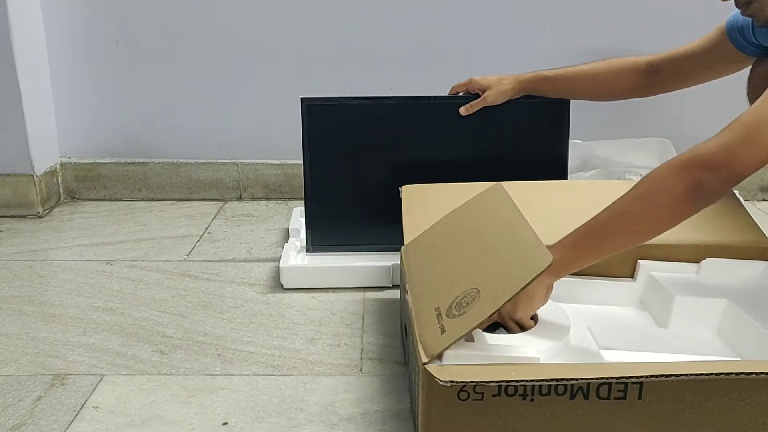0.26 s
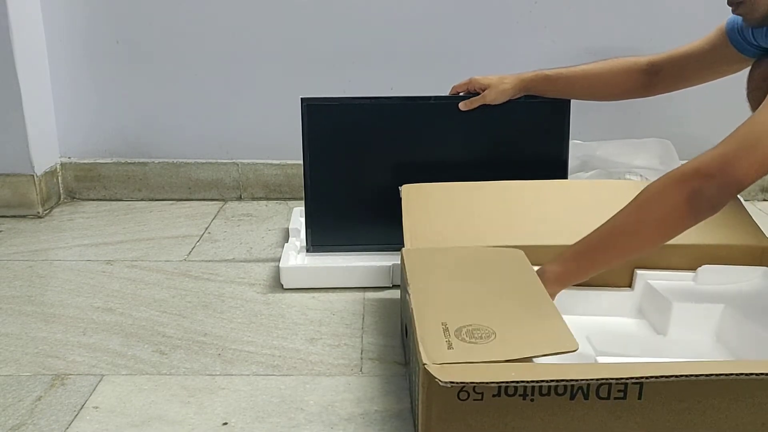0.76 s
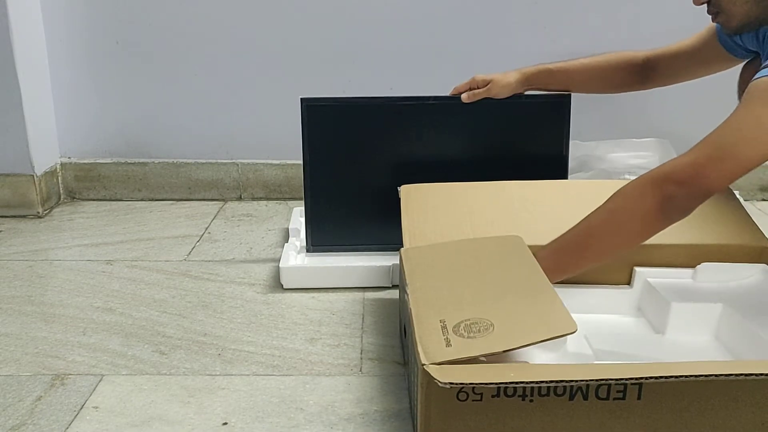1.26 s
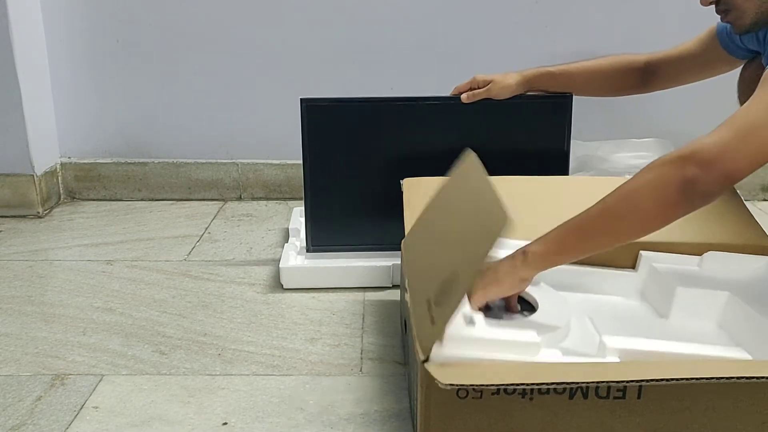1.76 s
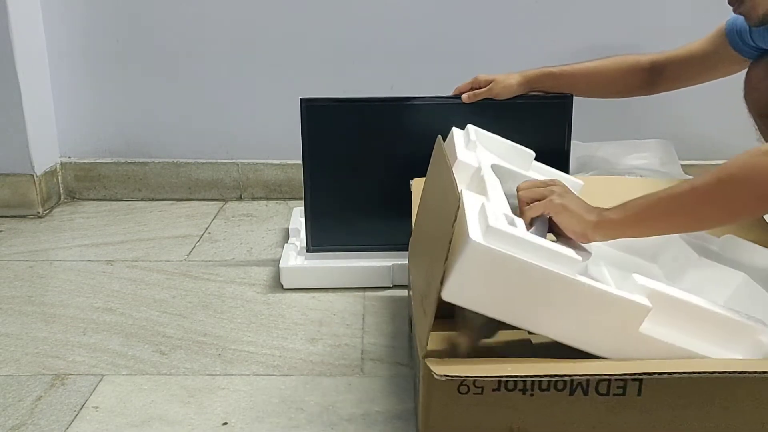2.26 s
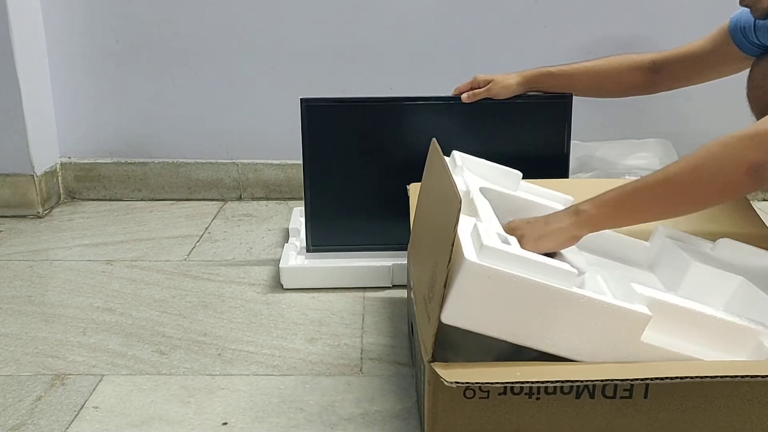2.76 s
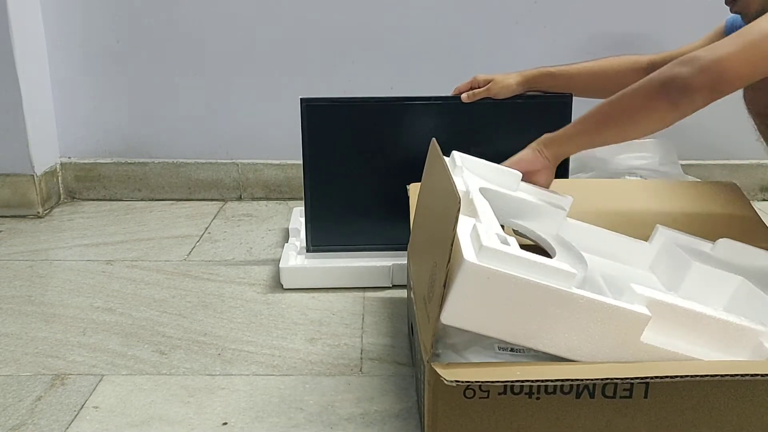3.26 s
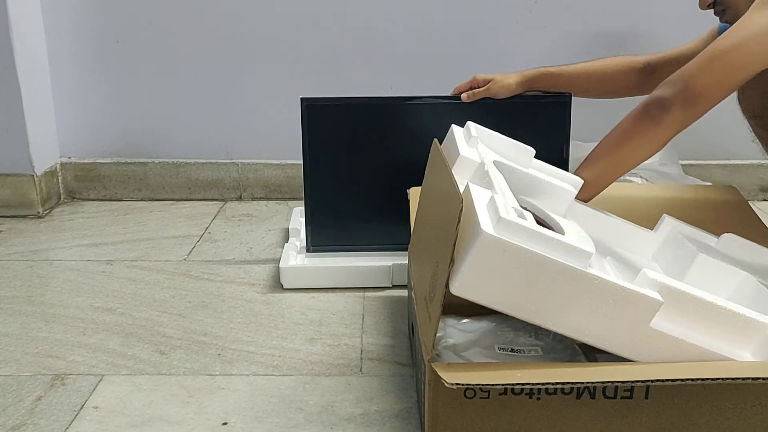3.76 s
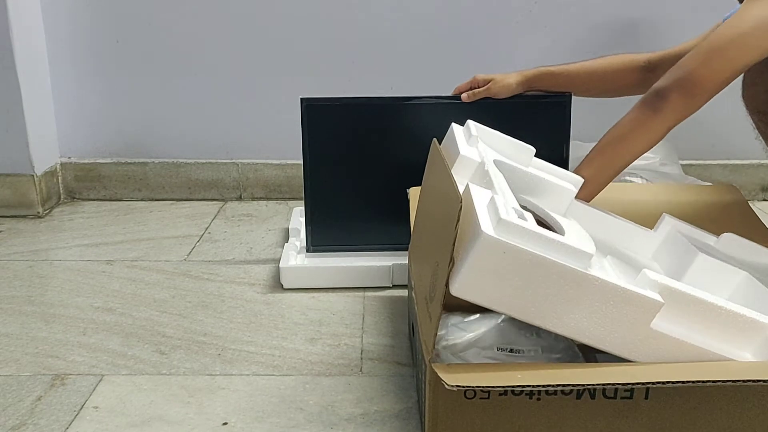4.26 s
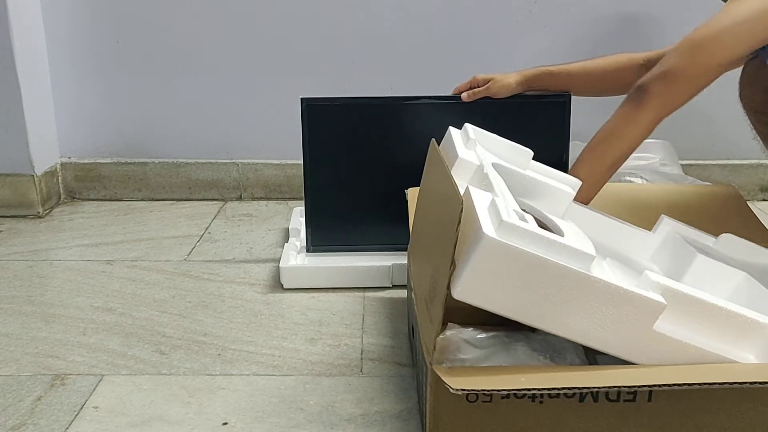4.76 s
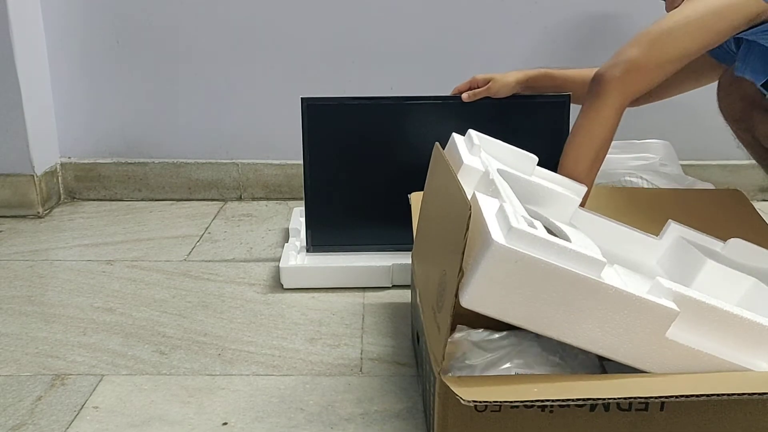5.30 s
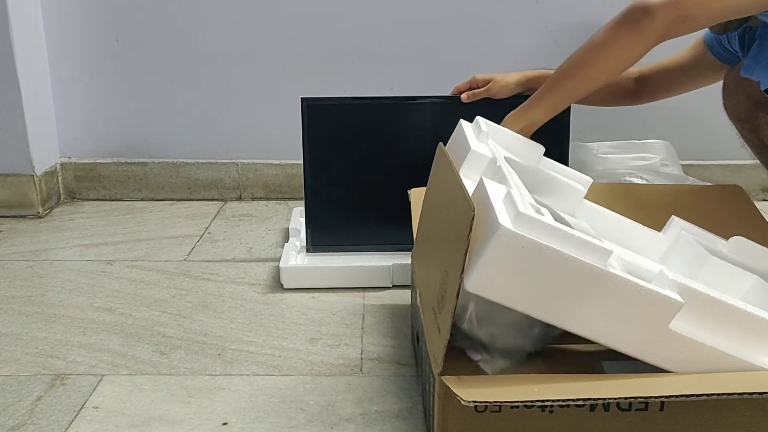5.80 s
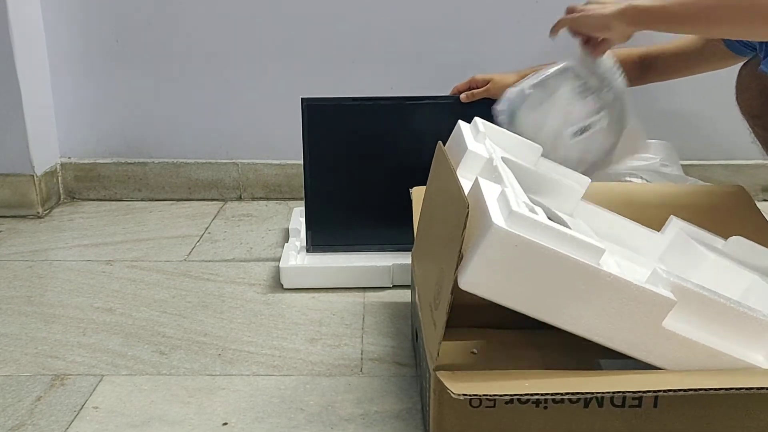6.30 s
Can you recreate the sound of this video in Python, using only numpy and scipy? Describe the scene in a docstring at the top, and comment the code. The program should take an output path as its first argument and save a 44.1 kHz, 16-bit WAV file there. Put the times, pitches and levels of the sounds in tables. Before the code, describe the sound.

Dry cardboard flap rubbing, then squeaky polystyrene foam scraping up a box wall, hollow knocks, rustling plastic bag, and a final heavy double boom indoors.

```python
"""In a bare, tiled room, a polystyrene tray is levered out of a cardboard box.
A flap rubs and foam scrapes up the wall: random slips coloured as hiss, fizz and panel drone; edges rasp.
Knocks are swelling, damped sines with bursts of crushed beads, and small snaps are filtered noise bursts.
A bagged hard part, a bank of dying sines, is dragged out from underneath, and the tray drops back with
a hollow boom. Decaying noise and standing waves make the echoes, over coloured noise for quiet air."""
import sys
import numpy as np
from scipy import signal
from scipy.fft import rfft, irfft, next_fast_len
from scipy.io import wavfile

SR = 44100
rng = np.random.default_rng(int(sys.argv[2]) if len(sys.argv) > 2 else 0)


def generate_wav(signal):
    """Clip the signal to [-1, 1] and save it as 16-bit WAV at the path in sys.argv[1]."""
    frames = np.transpose(np.atleast_2d(signal))
    scaled = np.clip(frames, -1, 1) * 32767
    pcm = np.round(scaled).astype(np.int16)
    wavfile.write(sys.argv[1], SR, pcm)


N = 288414
TIME = np.arange(N) / SR  # s

# fine bead fizz of flap and bag, relative spectrum: f/Hz, level/dB per Hz
FINE_FIZZ = [(5000, -27), (8500, 10.5), (10500, 7.5), (12500, 5), (14000, 10), (15700, 13)]
# drone of the panels under foam and bag, relative spectrum: f/Hz, level/dB per Hz
PANEL_DRONE = [(25, -43), (60, 3), (100, -6), (130, 3), (200, 7), (330, 6), (450, 1.5), (650, -4.5),
               (1000, -1), (1500, -27), (3000, -23)]


def amp(db):
    """Decibels to gain."""
    return 10 ** (np.asarray(db) / 20)


def unit(x):
    """Scales to rms 1."""
    return x / np.sqrt(np.mean(x ** 2) + 1e-20)


def read(points, hz):
    """Reads a table along a log-frequency axis."""
    f, value = np.transpose(points)
    return np.interp(np.log(hz + 1), np.log(f + 1), value)


def add(mix, s, sound):
    """Mixes a sound in at time s."""
    part = mix[max(round(s * SR), 0):][:len(sound)]
    part += sound[:len(part)]


def convolve(x, response):
    """Convolution along time, cut to the scene's length."""
    return signal.fftconvolve(np.atleast_2d(x), np.atleast_2d(response), axes=1)[:, :N]


def colour(x, points, size=4096):
    """Causal (minimum-phase) filter of energy 1, shaped like the given spectrum."""
    hz = abs(np.fft.fftfreq(size, 1 / SR))
    log_gain = np.log(amp(read(points, hz)))
    spectrum = np.exp(np.conj(signal.hilbert(log_gain)))
    taps = np.fft.ifft(spectrum).real[:size // 2]
    return convolve(x, taps / np.linalg.norm(taps))


def diffuse(pair):
    """Two unrelated signals become sound from all sides: long waves reach both microphones nearly alike."""
    spacing_m, sound_speed = 0.16, 343  # m, m/s
    size = next_fast_len(pair.shape[1])
    a, b = rfft(pair, size)
    hz = np.fft.rfftfreq(size, 1 / SR)
    likeness = np.sinc(2 * hz * spacing_m / sound_speed) * .97
    mid = a * np.sqrt((1 + likeness) / 2)
    side = b * np.sqrt((1 - likeness) / 2)
    return irfft(np.array([mid + side, mid - side]), size)[:, :pair.shape[1]]


def ring(modes, phase=0):
    """One second of dying sines, one for each resonance."""
    t = TIME[:SR]
    return sum(amp(db - 60 * t / t60) * np.sin(2 * np.pi * hz * t + phase) for hz, db, t60 in modes)


def wander(per_s):
    """Random fluctuation of rms 1, taking a new value per_s times a second with straight lines between."""
    knots = rng.standard_normal(N // 32)
    return unit(np.interp(TIME * per_s, np.arange(len(knots)), knots))


def grains(per_s, spread_db):
    """Tiny slips at random moments and of either sign; spread_db scatters their sizes."""
    size = amp(spread_db * np.minimum(rng.exponential(1, (2, N)), 5))
    sign = rng.choice([-1, 1], (2, N))
    happens = rng.random((2, N)) < per_s / SR
    return unit(diffuse(size * sign * happens))


def burst(rise_s, decay_s):
    """Many beads giving way at once: a dense, quickly dying cluster of noise."""
    t = TIME[:SR // 4]
    shape = (1 - np.exp(-t / rise_s)) * np.exp(-t / decay_s)
    return shape / shape.max() * rng.standard_normal(len(t))


def effort(strokes):
    """In every stroke the hand speeds up, then slows to a stop: gains of two layers, first and second."""
    first_law, second_law = 0.7, 1  # loudness grows as these powers of speed, so the second needs more
    first, second = np.zeros((2, N))
    for start, rise_s, fall_s, db, second_db in strokes:
        speeding = (TIME - start) / rise_s
        slowing = 1 - (TIME - start - rise_s) / fall_s
        speed = np.clip(np.minimum(speeding, slowing), 0, 1)
        first += (amp(db) * speed ** first_law) ** 2  # overlapping strokes add in power
        second += (amp(db + second_db) * speed ** second_law) ** 2
    return np.sqrt(first), np.sqrt(second)


def stroke(strokes, hiss_colour, fizz_colour, drone_colour, drone_db, drone_law, judder_db, slips_per_s):
    """Beads catch and let go: a hiss, a fine fizz, and the drone of the panels, which even a light touch shakes."""
    firm_db = -43.5  # hiss of an ordinary, firm stroke; drone_db is the drone beneath it
    hiss, fizz = effort(strokes)
    drone = amp(drone_db) * (hiss / amp(firm_db)) ** drone_law
    grip = unit(amp(judder_db * wander(140)))  # stick and slip, shared by all sizes of grain
    # whole beads tearing free, mixed under the finer slips
    catches = convolve(grains(per_s=100, spread_db=1.0), burst(rise_s=0.00054, decay_s=0.0045))
    slips = unit(grains(slips_per_s, spread_db=0.0) + amp(-7) * unit(catches))
    sound = hiss * colour(slips, hiss_colour) + fizz * colour(slips, fizz_colour)
    sound += drone * colour(grains(per_s=450, spread_db=1.5), drone_colour)
    return sound * grip


def quiet_air():
    """The room's quiet air: steady noise from all sides, strongest in the lows."""
    # relative spectrum: f/Hz, level/dB per Hz
    air_colour = [(25, -23), (55, 4.5), (100, -1), (125, 3), (250, -0.5), (600, -5), (1500, -16),
                  (4000, -26.5), (7000, -25), (10000, -33.5), (15500, -32)]
    return amp(-50.5) * colour(diffuse(rng.standard_normal((2, N))), air_colour)


def flap():
    """The cardboard flap rubs on arm and foam: dense slips, with the flap's own drone."""
    # start t/s, speeding up t/s, slowing down t/s, hiss level/dB, bead fizz over the hiss level/dB
    rubs = [(0.0, 0.0011, 0.21, -49.5, -4.5), (0.1, 0.018, 0.36, -50, -4), (0.29, 0.052, 0.34, -50.5, -5),
            (0.5, 0.0058, 0.21, -50.5, -6), (0.61, 0.037, 0.22, -46.5, -0.5),
            (0.71, 0.067, 0.31, -46.5, -5), (1.04, 0.058, 0.18, -45, -1.5), (1.2, 0.24, 0.048, -50, -4),
            (1.365, 0.028, 0.22, -42, -3.5), (1.53, 0.023, 0.19, -47.5, 1), (1.58, 0.11, 0.061, -46, -1)]
    # relative spectra: f/Hz, level/dB per Hz
    hiss_colour = [(400, 0), (1200, 2), (2000, -1), (3000, -5), (4500, -6), (7000, -4), (8500, -15),
                   (11000, -18)]
    drone_colour = [(25, -1), (60, -7), (110, -12.5), (200, 2.5), (330, 1.5), (450, -1), (600, -6),
                    (800, -11), (1050, -5), (1500, -19.5), (3000, -32)]
    return stroke(rubs, hiss_colour, FINE_FIZZ, drone_colour,
                  drone_db=-43.5, drone_law=0.82, judder_db=0.9, slips_per_s=9000)


def swing(hz, swell_s):
    """A damped panel under a soft blow: it swells and is still again within a few cycles."""
    t = TIME[:SR // 10]
    u = t / swell_s
    return (u * np.exp(1 - u)) ** 2 * np.sin(2 * np.pi * hz * t)


def knocks():
    """Each blow swings tray, box wall and enclosed air for a few cycles, and crushes beads: (thuds, crush)."""
    # foam and flap knocking on the box: t/s, tray swing level/dB, tray f/Hz, wall over the tray swing level/dB,
    # # wall f/Hz, then over the tray swing: crunch level/dB, hardness level/dB, squeezed-out air level/dB
    blows = [(0.085, -34, 170, -9, 289, -14.5, -29, -12), (0.125, -44, 152, -4, 280, -10, -26, -18),
             (0.723, -32.5, 216, -2, 352, -16, -27, -14.5), (0.803, -38, 215, 4, 324, -6, -33, -30),
             (0.852, -20, 218, -4.5, 388, -19, -49, -40), (0.93, -31, 229, 0, 364, -26, -38, -33),
             (1.41, -46, 199, -5, 376, 1, -20, -2), (1.551, -23, 205, -3, 336, -22, -28.5, -28),
             (1.642, -30, 189, 1, 304, -28, -31, -30), (1.781, -20.5, 200, -9.5, 310, -31, -22, -29),
             (2.142, -39.5, 255, 14.5, 340, 0, -6, 3), (2.175, -30.5, 169, -6, 430, -7, -15, -14),
             (2.208, -36, 172.4, 0, 354, -3, -17, -21), (2.616, -23.5, 172, 1.5, 312, -5.5, -21, -14),
             (2.69, -36.5, 155, 5, 269, -13, -30, -16), (3.065, -12, 265.7, -6.5, 315, -10, -18.5, -20.5),
             (3.112, -26.5, 160, -1, 273, -13.5, -17, -30), (3.16, -26.5, 173, 1, 283, -7, -21, -31),
             (3.403, -22, 215, -0.5, 348, -7.5, -26, -18), (3.433, -23, 181, -6, 409, -7, -21.5, -20),
             (3.727, -39, 145, 1, 343, -6.5, -21, -3), (3.77, -38.5, 149, -10, 324, -8, -22, -1.5),
             (3.81, -28.5, 224.2, 12.5, 332.5, -3.5, -21, -15.5),
             (4.136, -40.5, 188, 12, 317, -22, -41, -35), (4.216, -34, 237, 3, 315, -3, -37, -40),
             (4.671, -32.5, 160, 0.5, 286, -8.5, -23, -29), (4.785, -38.5, 215, -8, 330, -9, -23, -22),
             (4.92, -42, 235, -4, 424, -6, -26, -28), (5.66, -40, 230, -1, 373, -8, -22, -24),
             (5.448, -30, 166, -21, 320, -28, -34, -21), (5.889, -7.5, 155, -2.5, 298, -18.5, -36.5, -36),
             (5.919, -6, 218, -23, 502, -29, -35.5, -38), (6.099, -17.5, 143, 1, 316, -22.5, -35.5, -50),
             (6.121, -13, 212, -24, 297, -31, -47, -52)]
    # relative spectra of crushed beads, breaking beads and squeezed-out air: f/Hz, level/dB per Hz
    crunch_colour = [(30, -6), (100, -2.5), (250, 2.5), (400, -1.5), (520, 1.5), (680, 0), (760, -4.5),
                     (860, -2), (1000, -6.5), (1800, -15.5), (3000, -29.5), (6000, -44)]
    crack_colour = [(800, -22), (1800, 6.5), (2400, -1), (3100, 2.5), (4200, 5), (5000, 7), (5400, 6.5),
                    (5800, 8.5), (6400, 2.5), (7500, 2.5), (10000, -4.5), (15500, -12)]
    push_colour = [(20, -26.5), (40, -17), (58, -1), (70, -2), (84, 1), (98, -9.5), (130, -4.5),
                   (200, -5.5), (400, -57)]
    upper_ratio, upper_db = 1.472, -14.5  # the wall's next mode: pitch and level against the first
    cavity_hz = 126.8  # the air inside the box
    cavity_db, cavity_per_hardness = 1, 0.44  # dB, dB per dB: a harder blow shakes the air more
    radiate_hz = 108.5  # below this the small panels move air poorly
    thumps, crunches, cracks, pushes = np.zeros((4, N))
    for s, db, hz, wall_db, wall_hz, crunch_db, hard_db, push_db in blows:
        tray = swing(hz, swell_s=0.0065)
        wall = swing(wall_hz, swell_s=0.0066)
        wall += amp(upper_db) * swing(wall_hz * upper_ratio, swell_s=0.0045)
        cavity = amp(cavity_db + cavity_per_hardness * hard_db) * swing(cavity_hz, swell_s=0.01)
        # the panels give first; beads break once the load has built up
        add(thumps, s - .003, amp(db) * (tray + amp(wall_db) * wall + cavity))
        add(crunches, s, amp(db + crunch_db) * burst(rise_s=0.00028, decay_s=0.034))
        add(cracks, s + .002, amp(db + hard_db) * burst(rise_s=0.016, decay_s=0.013))
        add(pushes, s, amp(db + push_db) * burst(rise_s=0.0067, decay_s=0.049))
    radiation = signal.butter(5, radiate_hz, "high", fs=SR, output="sos")
    thuds = signal.sosfilt(radiation, thumps) + colour(pushes, push_colour)
    crush = colour(crunches, crunch_colour) + colour(cracks, crack_colour)
    return thuds, crush


def resonate(x, hz, width_hz):
    """A resonance that follows the curve hz: shift the pitch down to zero, smooth, shift back."""
    turn = np.exp(2j * np.pi * np.cumsum(hz) / SR)
    r = np.exp(-np.pi * width_hz / SR)
    smooth = signal.lfilter([1 - r], [1, -r], x / turn + 1e-18)
    return 2 * (turn * smooth).real


def rasps():
    """A foam edge chatters over cardboard: uneven slips ring the panel, its pitch shifting as the edge travels."""
    # start t/s, length t/s, level/dB, first f/Hz, last f/Hz
    edge_rasps = [(0.41, 0.13, -51, 470, 450), (0.558, 0.13, -47, 570, 684), (1.39, 0.17, -49.5, 616, 720),
                  (2.124, 0.083, -41.5, 523, 488), (2.57, 0.11, -43, 600, 676),
                  (3.417, 0.097, -34, 754, 560), (3.814, 0.14, -40, 603, 500), (4.662, 0.14, -48, 677, 720),
                  (4.88, 0.15, -51.5, 650, 705), (5.627, 0.17, -50, 605, 570)]
    width_hz = 210  # of the panel resonance, which is applied twice
    out = np.zeros(N)
    slips = grains(per_s=260, spread_db=0.0)[0]
    for start, length, db, first_hz, last_hz in edge_rasps:
        u = np.arange(0, 1, 1 / (length * SR))
        hz = first_hz + (last_hz - first_hz) * u
        chatter = slips[round(start * SR):][:len(u)]
        for _ in range(2):
            chatter = resonate(chatter, hz, width_hz)
        add(out, start, amp(db) * unit(chatter) * np.sin(np.pi * u ** .5))
    return out


def snaps():
    """Small creases and beads of foam and bag letting go: short noise bursts in a two-octave band."""
    # t/s, level/dB before the band filter
    single_snaps = [(0.5107, -34), (0.849, -25.5), (1.051, -41), (2.611, -16.5), (3.436, -25.5),
                    (4.2148, -33), (4.297, -53), (4.403, -37), (4.439, -35.5), (4.5706, -38), (4.63, -33),
                    (4.671, -26.5), (4.7215, -29)]
    centre_hz = 885
    out = np.zeros(N)
    for s, db in single_snaps:
        add(out, s, amp(db) * burst(rise_s=0.0001, decay_s=0.0037))
    band = signal.butter(1, [centre_hz / 2, centre_hz * 2], "band", fs=SR, output="sos")
    return signal.sosfilt(band, out)


def foam():
    """The tray scrapes up the box wall: slipping beads, with the drone of the panels."""
    # start t/s, speeding up t/s, slowing down t/s, hiss level/dB, bead fizz over the hiss level/dB
    scrapes = [(1.7, .07, 0.064, -39.5, 2.5), (1.79, 0.048, 0.73, -39, 7.5), (1.91, 0.33, .13, -36, -12),
               (2.1, 0.082, 0.16, -39.5, 7), (2.27, 0.084, 0.18, -45, 3), (2.42, 0.099, 0.34, -40.5, 6),
               (2.55, 0.062, 0.16, -38.5, 0), (2.74, 0.042, 0.15, -46, -5), (2.86, 1, 0.08, -39.5, -14),
               (3.25, 0.027, 0.081, -55, 2.5), (3.36, 0.038, 0.12, -45, 7.5), (3.4, 0.12, 0.2, -39.5, 7.5),
               (3.66, 0.067, 0.084, -43.5, 6), (3.77, 0.12, 0.079, -52, -7)]
    # relative spectra: f/Hz, level/dB per Hz
    hiss_colour = [(400, 8), (1200, 10.5), (2000, 8), (2800, 5), (3600, 7), (4800, 4), (7000, 9.5),
                   (8500, -3), (11000, -2)]
    fizz_colour = [(5000, -36), (8500, 8.5), (10500, 5.5), (12500, 3.5), (14000, 6.5), (15700, 12.5)]
    return stroke(scrapes, hiss_colour, fizz_colour, PANEL_DRONE,
                  drone_db=-45.0, drone_law=0.86, judder_db=1.0, slips_per_s=4500)


def hard_part():
    """It rings briefly when bumped, and sings faintly and unevenly while it slides; the bag damps it."""
    # resonances: f/Hz, relative level/dB, 60 dB decay t/s
    part_modes = [(663, -10, 0.44), (852, 0, 0.42), (860, -1, 0.54), (1022, 1, 0.18), (1134, -10, 0.4),
                  (1484, -7.5, 0.13), (1544, -15, 0.16), (2410, -9, 0.094), (2370, 1.5, 0.23),
                  (3472, -7, 0.19)]
    # bumps: t/s, gain of upper modes level/dB, gain of lower modes level/dB
    clacks = [(3.0679, -34, -25), (4.6724, -50, -51.5), (5.9205, -41.5, -42.5), (5.9672, -41, -53),
              (6.106, -49, -51)]
    # slides: start t/s, speeding up t/s, slowing down t/s, lower modes level/dB, upper over lower level/dB
    slides = [(4.67, 0.03, 0.17, -49.5, -7), (5.6, 0.06, 0.4, -52, -4), (6.05, 0.04, 0.45, -62.5, -5)]
    split_hz = 2000  # border between the lower and the upper modes
    lower = ring([mode for mode in part_modes if mode[0] < split_hz])
    upper = ring([mode for mode in part_modes if mode[0] >= split_hz])
    out = np.zeros(N)
    for s, upper_db, lower_db in clacks:
        add(out, s, amp(lower_db) * lower + amp(upper_db) * upper)
    slips = grains(per_s=250, spread_db=-1.0)[0]
    for gain, modes in zip(effort(slides), (lower, upper)):
        out = out + convolve(slips * gain, modes / np.linalg.norm(modes))
    return out


def bag():
    """The bag is dragged from under the tray: hissing slips, with the drone of the panels."""
    # start t/s, speeding up t/s, slowing down t/s, hiss level/dB, bead fizz over the hiss level/dB
    tugs = [(4.27, 0.032, .04, -62, -18), (4.35, 0.21, 0.13, -62, -5), (4.43, 0.0097, 0.066, -60, 5),
            (4.55, 0.11, 0.23, -48, -4), (4.72, 0.19, 0.14, -42, 0), (4.88, 0.098, 0.16, -42.5, 1.5),
            (5.11, 0.096, 0.25, -48.5, -0.5), (5.37, 0.29, 0.2, -42, 2.5), (5.57, 0.11, 0.15, -41, -5),
            (5.76, 0.058, 0.19, -41, 0), (5.91, 0.014, 0.2, -41, 3), (6.09, 0.04, 0.17, -51.5, -3),
            (6.36, 0.011, 0.1, -55.5, -4)]
    # relative spectrum: f/Hz, level/dB per Hz
    hiss_colour = [(400, -0.5), (1200, 8), (2000, 4.5), (3000, 1.5), (4500, 1), (7000, 3), (8500, -6),
                   (11000, -11.5)]
    return stroke(tugs, hiss_colour, FINE_FIZZ, PANEL_DRONE,
                  drone_db=-45.0, drone_law=1.0, judder_db=0.54, slips_per_s=5100)


def room():
    """Echoes of hard walls and floor: a dense tail, and standing waves a little out of step at each microphone."""
    # standing waves: f/Hz, relative level/dB, 60 dB decay t/s
    room_modes = [(122.54, 5, 0.596), (164, -5, 0.45), (186, -5, 0.79), (215.3, -5, 0.93),
                  (229.2, 2.5, 0.64), (264, 1.5, 0.52), (287, 4, 0.56), (313.4, -3.5, 0.6),
                  (340, -1.5, 0.39), (368.6, 1.5, 0.52), (390, -18, 0.28)]
    # 60 dB decay of the tail: f/Hz, t/s
    tail_t60 = [(100, 0.81), (260, 0.49), (700, 0.96), (2000, 1), (5000, 0.67), (13000, 0.6)]
    # loudness of the tail: f/Hz, level/dB
    tail_level = [(35, -5.5), (70, -5), (100, -12), (125, 6.5), (250, -1.5), (380, 0.5), (550, 8), (900, 5),
                  (3000, 8.5), (15000, 2)]
    t = TIME[:SR]
    build_up = np.clip((t - .006) / 0.00067, 0, 1)
    taps = diffuse(rng.standard_normal((2, SR))) * build_up
    hz, at, z = signal.stft(taps, SR, nperseg=256)
    t60 = read(tail_t60, hz)[:, None]
    even_energy = np.sqrt(2 * np.log(1000) / (t60 * SR))  # long decays get no louder in total
    z *= amp(read(tail_level, hz)[:, None] - 60 * at / t60) * even_energy
    tail = signal.istft(z, SR, nperseg=256)[1][:, :SR]
    standing = np.zeros((2, SR))
    for mode in room_modes:
        phase = 0.094 * np.array([[1], [-1]]) * rng.choice([-1, 1])  # radians
        standing += ring([mode], phase)
    return tail + amp(-60.0) * standing * build_up


def scatter(x, turns_per_s, count=3):
    """Contacts shift from place to place, so their sound reaches the room by changing paths."""
    echoes = np.zeros((2, N))
    for k in range(count):
        share = np.cos(np.pi * (TIME * turns_per_s + k / count)) * np.sqrt(2 / count)
        echoes += convolve(x * share, room())
    return echoes


def scene():
    """Rubbing and blows in the room, over its quiet air."""
    air = quiet_air()
    thuds, crush = knocks()
    rubbing = flap() + foam() + bag() + rasps()
    part = hard_part()
    crackle = crush + snaps()
    echoes = convolve(thuds + amp(-7) * rubbing.mean(0), room())
    echoes += scatter(crackle + amp(-6.0) * part, turns_per_s=35)
    return air + thuds + crackle + rubbing + part + echoes


def record(dry):
    """The two microphones differ a little in colour; then the band limit."""
    # f/Hz, left minus right level/dB
    lean = [(100, 1), (350, 0.4), (700, 0.8), (1500, 0.8), (3000, 0.5), (5500, 2.5), (7500, 3.5),
            (9500, -5), (14000, 0)]
    edge_hz = 15900  # top of the band
    size = next_fast_len(N + SR // 10)
    lean_db = read(lean, np.fft.rfftfreq(size, 1 / SR))
    gains = amp(np.array([lean_db, -lean_db]) / 2)
    heard = irfft(rfft(dry, size) * gains, size)[:, :N]
    low_pass = signal.firwin(511, edge_hz, window=("kaiser", 9), fs=SR)
    return signal.oaconvolve(heard, low_pass[None], "same")


dry = scene()
out = record(dry)
generate_wav(out)
```